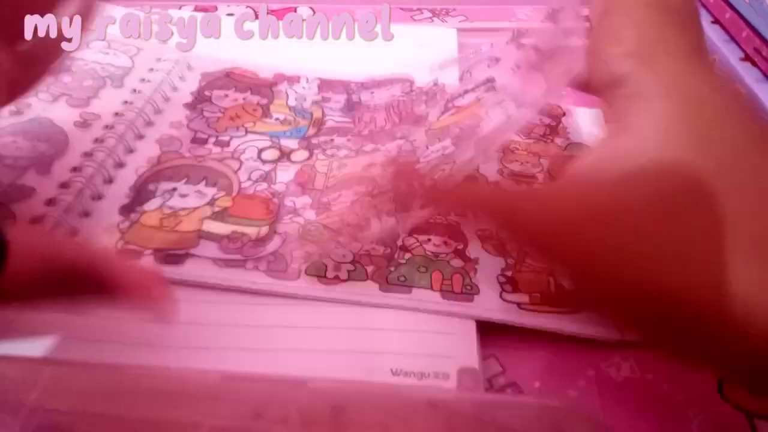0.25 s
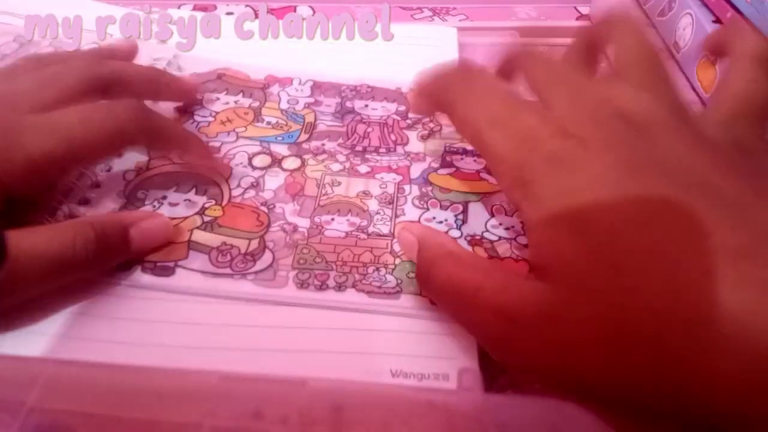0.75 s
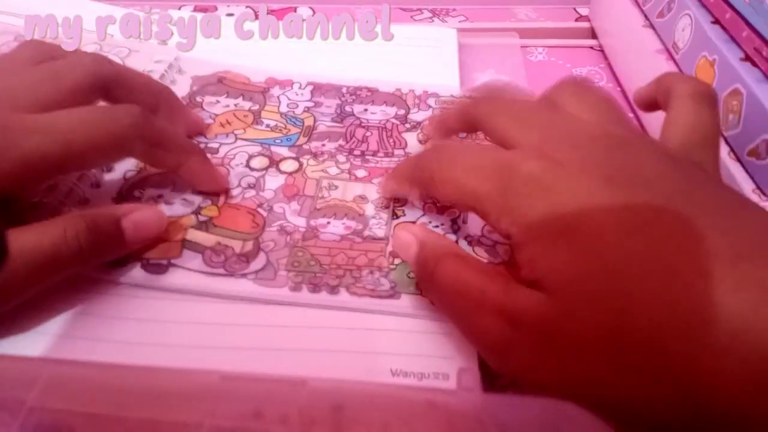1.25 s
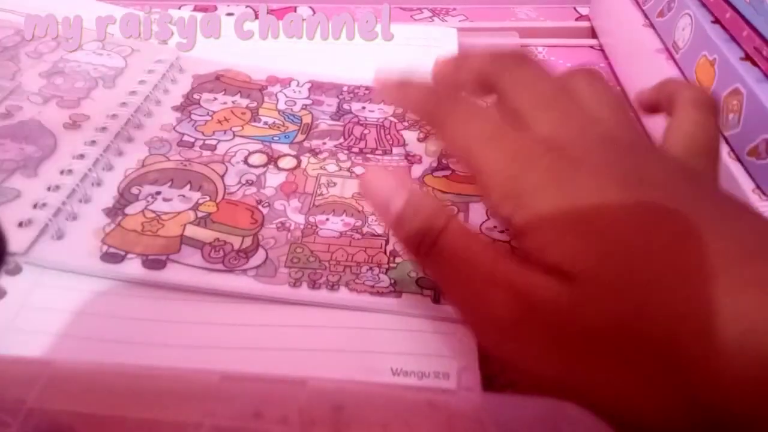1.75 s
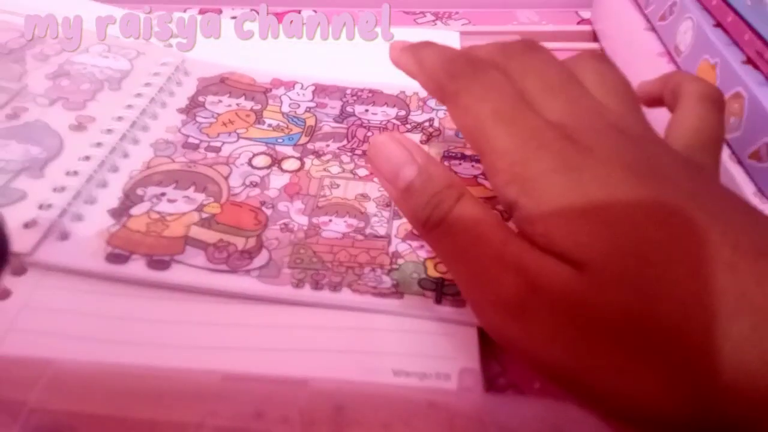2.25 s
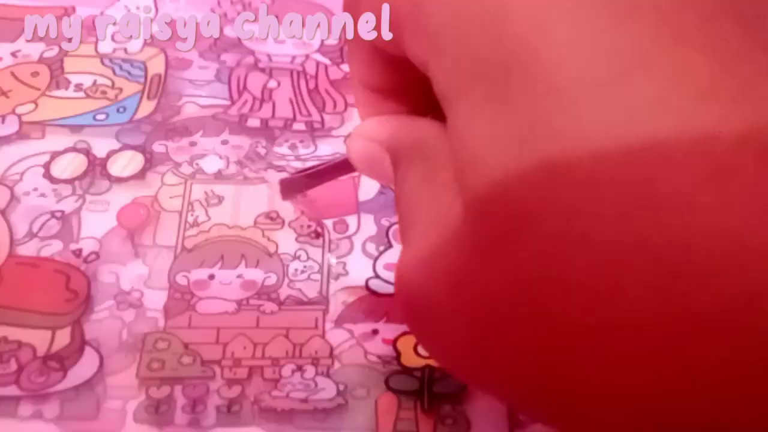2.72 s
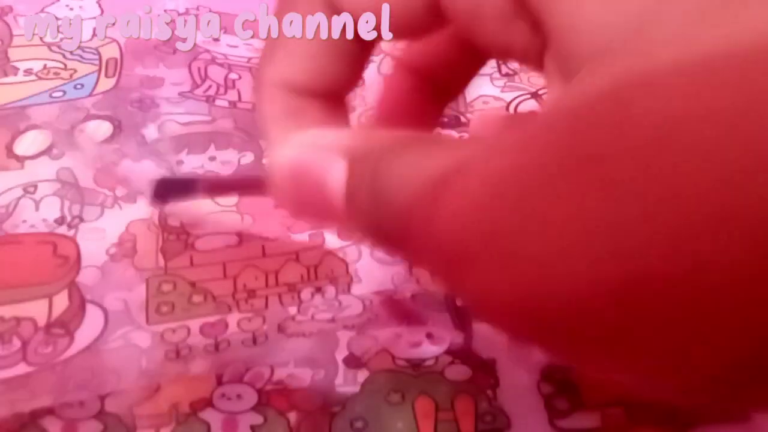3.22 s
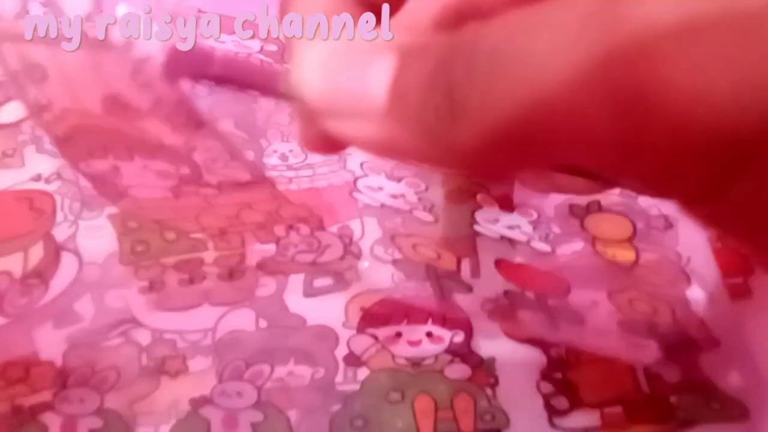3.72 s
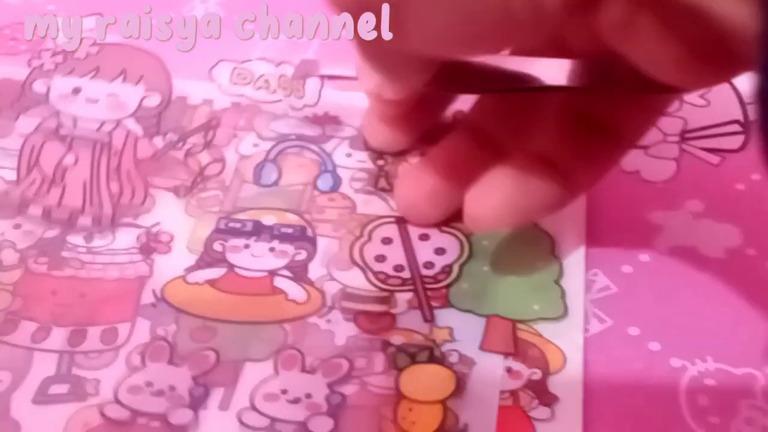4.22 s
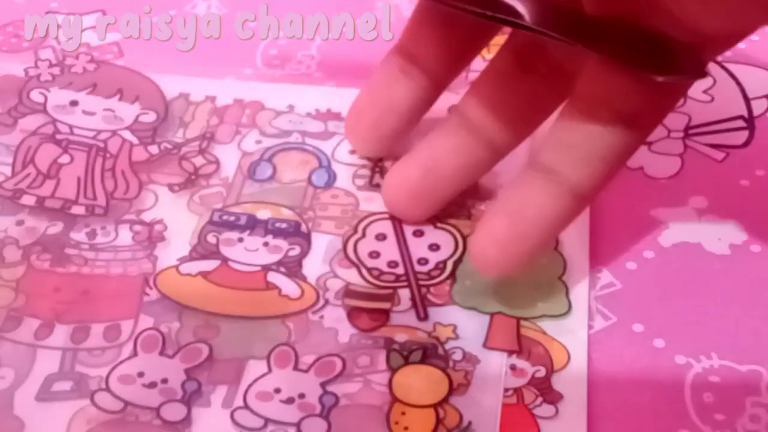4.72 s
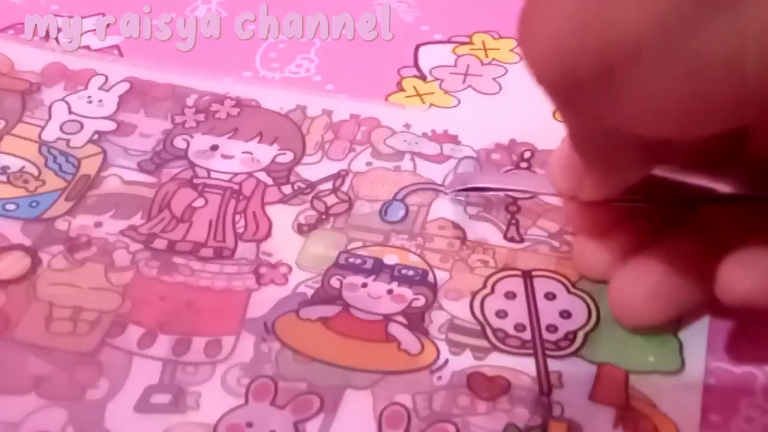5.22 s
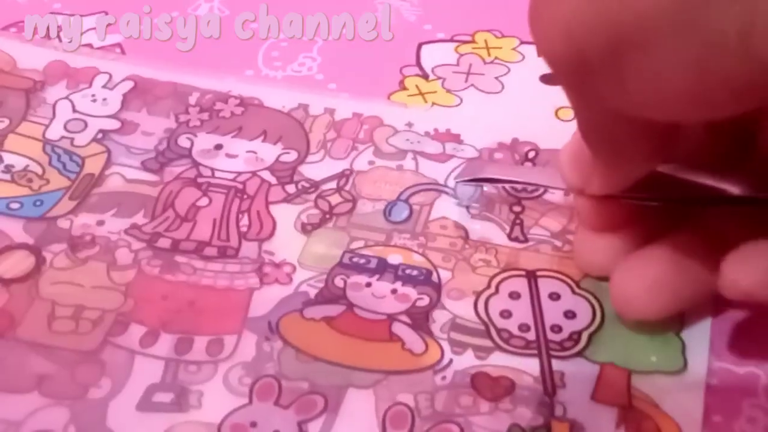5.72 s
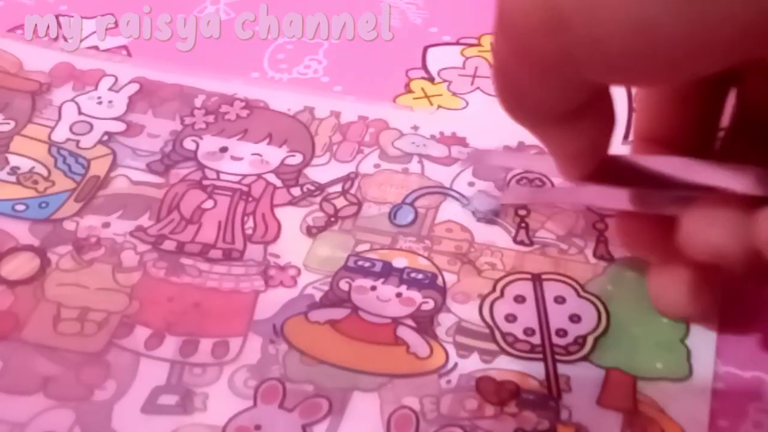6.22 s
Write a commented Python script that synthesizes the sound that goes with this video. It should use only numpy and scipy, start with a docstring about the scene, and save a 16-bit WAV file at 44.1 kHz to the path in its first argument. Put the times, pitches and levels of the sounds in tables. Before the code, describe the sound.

Close to the microphone in a small soft room, hands move over thin plastic film on a notebook. From 0 to 0.7 seconds there are busy rustles, crisp snaps and short dull fingertip pats, strongest at the very start. It then calms: a tiny tick near 1.2, a soft dry rub around 1.7, a faint pat at 2. A low mains hum throbs unevenly about three times a second throughout, over slight hiss. From about 2.8 to 3.8 peeling makes dense bright ticks and rustling, with a hard snap at 3.2 and more near 3.5. After a brief lull, crackling returns from 4.15, ending in the sharpest snaps around 4.46 and 4.57. An engine drones faintly outside from 4, sagging in pitch, then staying dim. Afterwards only sparse soft clicks and pats at 5.15, 5.45 and 5.95, then a small tick cluster near 6.4.

```python
"""Close up, a plastic sticker sheet is peeled and stroked on a notebook: its film snaps and crackles as creases
buckle and glue lets go, each a short burst of noise through the film's resonances. Skin rustles over it as
patchy noise mixed with tiny slips, and fingertips pat the paper with short dull rings. Behind, a mains hum
beats against a motor's hum just under it, an engine drones past outside, and the room hisses softly."""
import sys
import numpy as np
from scipy import signal
from scipy.fft import rfft, irfft, next_fast_len
from scipy.io import wavfile
from scipy.ndimage import uniform_filter1d, map_coordinates

SR = 44100
rng = np.random.default_rng(int(sys.argv[2]) if len(sys.argv) > 2 else 0)


def to_wav(s):
    """Save 16-bit WAV."""
    ch = np.atleast_2d(s).T  # columns
    pcm = np.round(np.clip(ch, -1, 1) * 32767)  # PCM
    wavfile.write(sys.argv[1], SR, pcm.astype(np.int16))


N = 285327

# dull resonances of the film lying over the paper: centre_hz, width_hz, level_db (relative)
DULL_FILM = [(605, 74, -2), (1090, 138, 0.5), (1326, 123, 3.5), (1640, 540, -0.5), (2042, 163, 3.5),
             (2284, 320, -1.5), (3247, 464, -1.5)]
# bright resonances of the same film: centre_hz, width_hz, level_db (relative)
BRIGHT_FILM = [(4200, 1330, -2), (4940, 543, 2.5), (5520, 685, -1), (6400, 1230, -4), (8210, 2700, -25.5)]


def amp(db):
    """Gain of a level in dB."""
    return 10 ** (np.asarray(db) / 20)


def unit(x):
    """x at rms 1."""
    return x / np.sqrt(np.mean(x ** 2) + 1e-20)


def curves(rows):
    """One value per sample for each column after the time, joined by straight lines."""
    times_s, *columns = np.transpose(rows)
    t = np.arange(N) / SR
    return [np.interp(t, times_s, column) for column in columns]


def wobble(rate):
    """A smooth random curve through normal random knots, rate of them a second."""
    knots = rng.standard_normal(int(N * rate / SR) + 4)
    return map_coordinates(knots, [np.arange(N) * rate / SR])


def filtered(x, response):
    """x filtered by multiplying its spectrum with a response of frequency in Hz."""
    n = x.shape[-1]
    padded = next_fast_len(n + 4096)
    spectrum = rfft(x, padded) * response(np.fft.rfftfreq(padded, 1 / SR))
    return irfft(spectrum, padded)[..., :n]


def modes(table):
    """Response of a set of resonances, with skirts steepened by a broad band-pass around them."""
    low_hz, high_hz = 0.35 * table[0][0], 1.61 * table[-1][0]

    def response(f):
        rings = 0
        for k, (centre, width, db) in enumerate(table):
            ring = 1j * f * width / (centre * centre - f * f + 1j * f * width)
            rings = rings + (-1) ** k * amp(db) * ring  # neighbours alternate in sign
        return rings * (1j * f / (low_hz + 1j * f)) ** 2 * (high_hz / (high_hz + 1j * f)) ** 2

    return response


def topmost(f):
    """Response of the topmost part: the film's sharpest edges plus the microphone port's narrow whistle."""
    # broad resonance of the sharpest edges: centre_hz, width_hz, level_db (relative)
    edges = [(9200, 5800, -10.5)]
    # resonance of the microphone port, before its cubing: centre_hz, width_hz, level_db (relative)
    port = [(15350, 430, 0.0059)]
    return modes(edges)(f) + 16 * modes(port)(f) ** 3  # the cube steepens the sides


def patchy(depth_db, size):
    """Noise of rms 1 whose colour shifts in patches, size = (frequency bins, time frames)."""
    noise = signal.stft(rng.standard_normal(N), nperseg=512)[2]
    field = uniform_filter1d(rng.standard_normal(noise.shape), size[0], axis=0)
    field = uniform_filter1d(field, size[1], axis=1)
    return unit(signal.istft(noise * amp(depth_db * unit(field)), nperseg=512)[1][:N])


def rumble(low_hz, high_hz):
    """Low noise of rms 1 between two soft edges."""
    band = lambda f: 1 / (1 + (low_hz / (f + 1)) ** 2) / (1 + (f / high_hz) ** 3)
    return unit(filtered(rng.standard_normal(N), band))


def air():
    """The room and microphone at rest: rumble and hiss in slowly moving patches, with faint room rings."""
    # colour of the resting noise: frequency_hz, density_db (relative, per Hz)
    resting_colour = [(20, -49), (45, -27.5), (110, -9), (170, -16.5), (240, -28), (320, -15.5),
                      (470, -33.5), (1390, -34), (2200, -34.5), (5880, -50), (8600, -56.5), (14000, -56),
                      (15200, -43), (16200, -69.5)]
    # faint room rings: centre_hz, half_width_hz, boost_db
    room_rings = [(625.4, 18.3, 10), (1360, 50, 7.5), (2110, 30, 9)]
    f, db = np.transpose(resting_colour)

    def colour(hz):
        boost_db = sum(boost / (1 + ((hz - c) / w) ** 2) for c, w, boost in room_rings)
        return amp(np.interp(np.log(hz + 1), np.log(f), db) + boost_db)

    return amp(-65.5) * unit(filtered(patchy(4.4, size=(3, 20)), colour))


def engine():
    """Low multiples of the firing rate, unsteady in level and phase, drone over a lumpy rumble."""
    # the engine passing outside: time_s, firing_hz, level_db (relative), tilt_db (per multiple)
    passing = [(3.85, 30.6, -85, 2), (4.0, 28.95, -52, 3), (4.19, 26.96, -50, .5), (4.53, 23.96, -52, -1.5),
               (4.72, 23.4, -58, 4), (4.88, 22.55, -60, 1.5), (5.0, 28.7, -61.5, -1),
               (5.8, 28.23, -57.5, -4.5), (6.47, 28, -67.5, -10.5)]
    # loudness of the engine's drone by frequency: frequency_hz, gain_db
    drone_gain = [(45, -15), (72, 2), (95, -9), (112, 2), (145, -7)]
    firing_hz, level_db, tilt_db = curves(passing)
    phase = 2 * np.pi * np.cumsum(firing_hz) / SR
    tones = 0
    for k in range(2, 6):
        gain_db = np.interp(k * firing_hz, *np.transpose(drone_gain))
        tone_db = level_db + gain_db + tilt_db * (k - 3.5) + 4.7 * wobble(9)
        tones = tones + np.sqrt(2) * amp(tone_db) * np.sin(k * phase + 0.94 * wobble(12))
    boom = unit(filtered(rng.standard_normal(N), modes([(322, 82, 0)])))  # the room answers near one pitch
    return tones + amp(level_db - 11.5 + 2.9 * wobble(8)) * (rumble(50, 140) + 0.31 * boom)


def hum():
    """Two close hums, mains and the motor's fourth multiple, beat in throbs; a weak mirror tone lies above."""
    mains_hz, mains_db, above_db = 100.8, -54, -67.5  # rms levels before the fast flutter
    # the motor's tones: multiple (of the turning rate), level_db (rms, before wobble and flutter)
    motor_tones = [(2, -82), (3, -79), (4, -57), (5, -67.5)]
    # beat of the two close hums, uneven in pace, weakest at whole counts: time_s, throbs (counted so far)
    beat = [(-.2, 0), (.46, 2), (1.6, 6), (2.21, 8), (2.87, 10), (3.52, 11), (3.82, 12), (4.62, 14),
            (4.88, 15), (5.52, 17), (5.78, 18), (6.47, 20)]
    mains = 2 * np.pi * mains_hz * np.arange(N) / SR
    throb = 2 * np.pi * (curves(beat)[0] + .5)  # phase between the two hums
    motor = sum(amp(db + wobble(3)) * np.sin(k * (mains - throb) / 4) for k, db in motor_tones)
    tones = amp(mains_db) * np.sin(mains) + amp(above_db) * np.sin(mains + throb) + motor
    # low noise swells and fades with each throb
    swelling_noise = amp(-60.5) * np.cos(throb / 2) ** 2 * rumble(53, 120)
    return np.sqrt(2) * tones * (1 + 0.31 * wobble(30)) + swelling_noise


def room(x):
    """The desk and a small soft room answer 2 ms late, with one short and one longer decay of noise."""
    t = np.arange(SR // 4) / SR
    decay = amp(-60 * t / .04) + .2 * amp(-60 * t / .3)
    tail = rng.standard_normal(len(t)) * decay
    return signal.fftconvolve(x, np.pad(tail, (90, 0)) / np.linalg.norm(tail))[:N]


def pats():
    """A soft fingertip pushes the pad of paper for half a cycle of its short, dull ring."""
    # fingers landing on the notebook: start_s, peak_db (without the room), ring_hz
    landings = [(.033, -32.5, 420), (.122, -38, 422), (.196, -35.5, 414), (.61, -37, 157),
                (1.985, -50.5, 395), (3.185, -49, 390), (3.513, -42.5, 404), (4.462, -52, 425),
                (5.15, -47, 410), (5.456, -48.5, 257), (6.396, -49.5, 330)]
    out, t = np.zeros(N + SR), np.arange(SR // 10) / SR
    for start_s, peak_db, hz in landings:
        push = np.sin(2 * np.pi * hz * t) * (t < .5 / hz)
        push += 0.82 * rng.standard_normal(len(t)) * np.exp(-t / 0.033)
        thud = filtered(push, modes([(hz, .5 * hz, 0)]))
        out[round(start_s * SR):][:len(t)] += amp(peak_db) * thud / np.abs(thud).max()
    return out[:N]


def rustle_levels():
    """Bright, dull and crackle levels in dB: rustle swells add in power to the hands resting on the film."""
    # rustle swells, some of them dying away after a snap:
    # peak_s, rise_s, fall_s, bright_db, dull_db, crackle_db (before the rustle's trims)
    swells = [(0, 0.046, 0.096, -43.5, -38.5, -66.5), (.15, 0.073, 0.053, -53, -41, -76.5),
              (.23, 0.085, 0.13, -60, -49, -90), (.4, .05, .12, -58.5, -49, -77),
              (.54, .04, .12, -60.5, -60, -85.5), (.71, 0.22, 0.057, -65.5, -59.5, -95),
              (1.18, .07, 0.23, -80, -69, -86), (1.7, 0.18, .1, -56, -57.5, -78),
              (2, 0.097, 0.061, -81, -56.5, -95), (2.3, .6, .6, -95, -70.5, -90.5),
              (2.72, 0.13, 0.049, -80, -64, -77.5), (2.92, .07, .2, -52, -51, -77),
              (3.1, .15, .2, -54, -57.5, -75), (3.22, .05, .3, -54.5, -56.5, -69),
              (3.4, .2, .08, -63.5, -76.5, -75), (3.53, .05, .09, -52, -52.5, -59.5),
              (3.7, 0.37, 0.14, -62, -66.5, -69.5), (3.965, 0.17, .008, -66, -78, -78.5),
              (4.18, 0.058, 0.15, -56, -58, -58.5), (4.35, 0.11, .25, -64, -57, -69),
              (4.5, .05, .1, -57, -56, -77), (4.6, .05, .15, -56.5, -51, -77),
              (4.81, 0.056, .07, -82, -58.5, -88), (5.225, .02, 0.13, -72, -65, -76),
              (5.28, 0.16, 0.048, -77, -54.5, -100), (5.62, 0.2, .12, -92, -66.5, -100),
              (5.95, .15, 0.093, -79.5, -66, -81.5), (6.42, 0.086, 0.054, -72, -55, -77.5)]
    # hands lying on the film, same level scale: bright_db, dull_db, crackle_db
    resting_db = [-87.5, -80, -86]
    fade_db, fade_shape = 21.5, 1.48  # loss over one rise or fall time; shape 1 = straight in dB
    t = np.arange(0, N, 32) / SR
    power = amp(resting_db)[:, None] ** 2
    for peak_s, rise, fall, *levels_db in swells:
        away = np.where(t < peak_s, (peak_s - t) / rise, (t - peak_s) / fall)
        power = power + amp(np.array(levels_db)[:, None] - fade_db * away ** fade_shape) ** 2
    return curves(np.transpose([t, *(10 * np.log10(power))]))


def grains(rate, spread_db):
    """Tiny slips of uneven size that come in clumps, as noise of rms about 1."""
    hit = rng.random(N) < rate / SR * amp(5 * wobble(30))
    sizes = hit * amp(spread_db * rng.exponential(size=N))
    swell = signal.lfilter([1], [1, -np.exp(-1 / (0.0012 * SR))], sizes)  # 1.2 ms decay constant
    return rng.standard_normal(N) * swell / np.sqrt(np.mean(swell ** 2))


def rustle():
    """Skin slides smoothly over the film; glue letting go adds sharp crackle that reaches the top octave."""
    bright_db, dull_db, crackle_db = rustle_levels()
    slips = grains(rate=330, spread_db=2.8)
    sharp = np.clip((crackle_db + 81.5) / 16, .03, .9)  # share of slips, in power

    def rub(share):
        return np.sqrt(1 - share) * patchy(5.1, size=(3, 9)) + np.sqrt(share) * slips

    bright = amp(bright_db + 1.5) * unit(filtered(rub(sharp), modes(BRIGHT_FILM)))
    dull = amp(dull_db - 2.5) * unit(filtered(rub(.45 * sharp), modes(DULL_FILM)))
    crackle = amp(crackle_db - 3.5) * unit(filtered(rub(sharp), topmost))
    return bright + dull + crackle


def snaps():
    """A crease or a spot of glue lets go: a short noise burst through the film's resonances, one ringing on."""
    # creases buckling: start_s, bright_db, dull_db (both relative), length_ms (nominal), ring_hz (strongest)
    creases = [(.011, -25.5, -19.5, 2.3, 1160), (0.0341, -45.5, -24, 1, 1560),
               (0.0803, -35.5, -30.5, 4.1, 1160), (0.1225, -27.5, -20.5, 6.2, 1315),
               (0.1432, -41, -35, 3.6, 1230), (0.168, -38.5, -28, 2.2, 1230),
               (0.1954, -38.5, -21.5, 3.9, 1690), (0.2143, -48, -35, 5.4, 1180),
               (0.2596, -41, -29.5, 1.1, 1200), (0.2648, -33.5, -36, 3.7, 5030), (.359, -52, -45, 3, 1490),
               (0.383, -30.5, -33.5, 3.2, 4830), (0.4186, -45, -40, 2.1, 1570),
               (0.4827, -45.5, -28.5, 1.84, 1540), (0.6083, -40, -36, 7, 1170),
               (.6958, -36, -36, 5.4, 3960), (1.164, -54.5, -49, 9.8, 1820), (1.9707, -45.5, -36, 5, 1300),
               (2.678, -60.5, -46.5, 0.59, 930), (2.854, -45, -37.5, 1.8, 1840),
               (2.895, -44, -34, 5.9, 3230), (3.1846, -21, -20.5, 3.1, 4330),
               (3.283, -34, -37.5, 3.3, 2310), (3.5127, -31, -26.5, 1.4, 1370),
               (3.5244, -28.5, -32, 1.7, 5400), (4.1781, -45, -38.5, 1.8, 1480),
               (4.3374, -37.5, -30, 2.5, 2160), (4.4592, -24.5, -31.5, 5.1, 3916),
               (4.5681, -23.5, -28, 0.26, 4650), (4.5742, -20, -19.5, 2.85, 2400),
               (4.585, -51, -28.5, 2.1, 2320), (5.1495, -38, -35.5, 2.36, 1050),
               (5.9553, -42.5, -41.5, 2.4, 2360), (6.3945, -43.5, -35, 2.5, 1450),
               (6.4186, -48.5, -40, 2.3, 1090)]
    # ticks of glue letting go: start_s, bright_db, topmost_db (both relative)
    ticks = [(2.778, -59, -55), (2.822, -49.5, -57), (2.861, -45, -58), (2.88, -43, -62), (2.975, -42, -60),
             (3.023, -31.5, -44), (3.0276, -34, -47), (3.043, -35, -53), (3.049, -35.5, -45),
             (3.093, -38, -55), (3.111, -40.5, -56), (3.128, -34, -50), (3.1331, -33, -43),
             (3.2505, -44, -53), (3.275, -34, -43), (3.311, -44, -49), (3.3365, -41, -60),
             (3.346, -45, -55), (3.371, -41, -66), (3.382, -38.5, -69), (3.4097, -39, -64),
             (3.4555, -43, -60), (3.491, -43, -56), (3.5054, -43, -57), (3.536, -42, -62),
             (3.607, -46, -55), (3.624, -37.5, -44), (3.645, -39, -62), (3.659, -36.5, -57),
             (3.7066, -32.5, -52), (3.7302, -34.5, -45), (3.7506, -39.5, -61), (3.7785, -50, -62),
             (3.803, -48.5, -83), (3.851, -46.5, -78), (4.163, -32.5, -44), (4.216, -35.5, -40.5),
             (4.251, -45.5, -62), (4.305, -52.5, -59), (4.33, -39, -52), (4.3618, -37, -54),
             (4.3823, -38, -52), (4.4045, -49.5, -68), (4.49, -45, -61), (4.507, -41.5, -53),
             (4.519, -43, -53), (4.543, -32.5, -42.5), (5.2232, -51, -68), (5.285, -56, -77),
             (6.2855, -44, -75), (6.3808, -35.5, -48)]
    events = []
    for start_s, bright_db, dull_db, ms, hz in creases:
        top_db = -39 + 2.8 * (bright_db + 24)  # the topmost part grows faster than the bright part
        events.append((start_s, bright_db, dull_db, top_db, ms, hz))
    for start_s, bright_db, top_db in ticks:
        hz = 5060 * (1 + 0.13 * rng.normal())  # the ring scatters from tick to tick
        events.append((start_s, bright_db, bright_db - 16, top_db, 1.5, hz))

    out, t = np.zeros(N + SR), np.arange(1500) / SR
    for start_s, bright_db, dull_db, top_db, ms, hz in events:
        life = 0.27 * ms / 1000  # decay constant, s
        burst = rng.standard_normal(len(t)) * (t / life) ** 2 * np.exp(-t / life)
        ring = lambda f: 1 + 4 * 1j * f * 0.076 * hz / (hz * hz - f * f + 1j * f * .1 * hz)
        parts = (modes(BRIGHT_FILM), bright_db), (modes(DULL_FILM[1:]), dull_db), (topmost, top_db)
        for colour, db in parts:
            part = filtered(burst, lambda f: colour(f) * ring(f))
            # scaled by its whole energy, so a longer burst at the same level holds no more
            out[round(start_s * SR):][:len(t)] += amp(db + 13.5) * part / np.linalg.norm(part)
    return out[:N]


def scene():
    """Hands and film close by, snaps and pats also answered by the room, over hum, engine and hiss."""
    close = snaps() + pats()
    wet = amp(-12) * room(close)
    return (close + wet + rustle() + hum() + engine() + air())[None]


def record(dry):
    """The phone's microphone keeps nothing above its band limit, sloping off over the last 800 Hz."""
    top_hz = 16600
    return filtered(dry, lambda hz: np.clip((top_hz - hz) / 800, 0, 1) ** 2)


dry = scene()
out = record(dry)
to_wav(out)
```